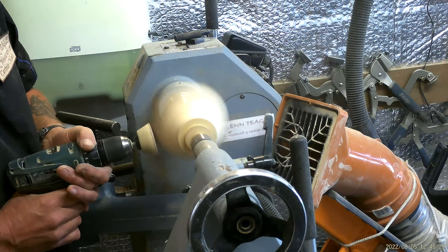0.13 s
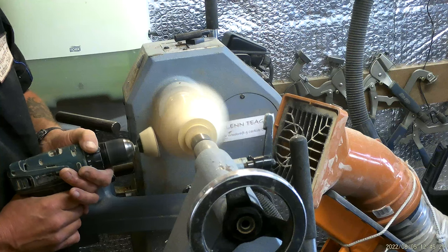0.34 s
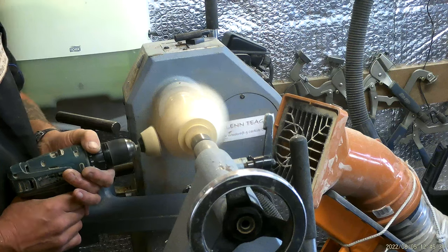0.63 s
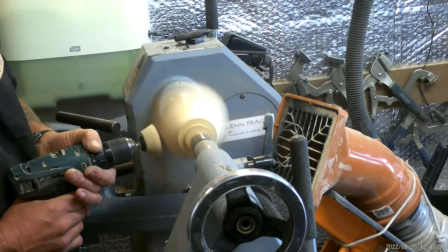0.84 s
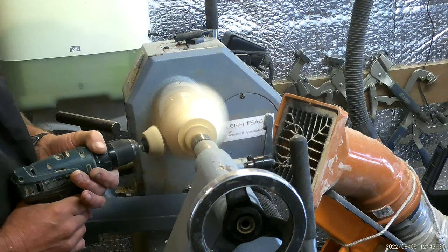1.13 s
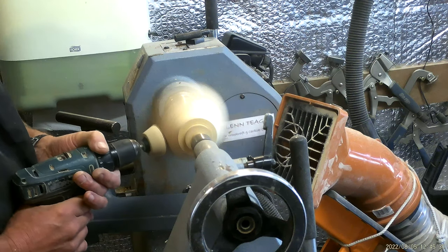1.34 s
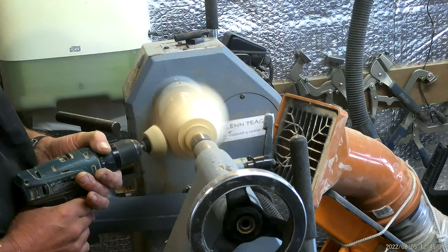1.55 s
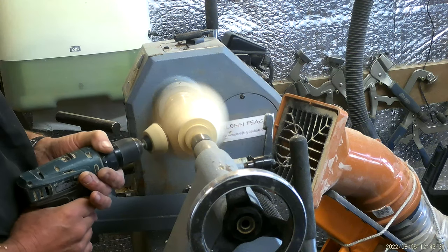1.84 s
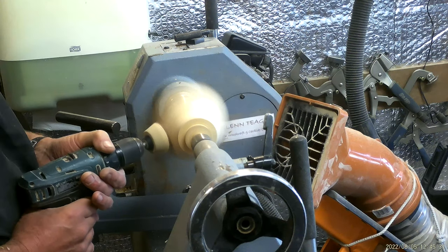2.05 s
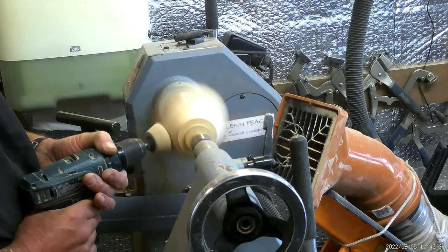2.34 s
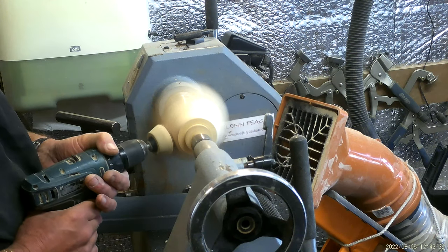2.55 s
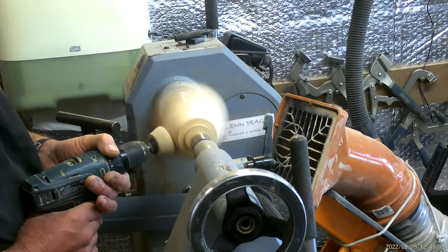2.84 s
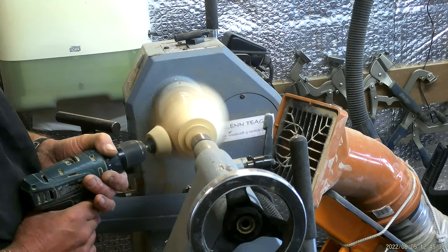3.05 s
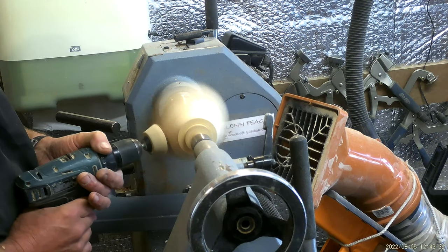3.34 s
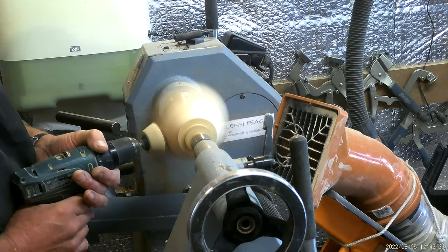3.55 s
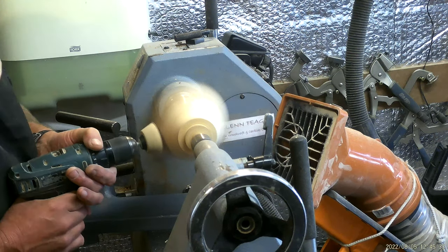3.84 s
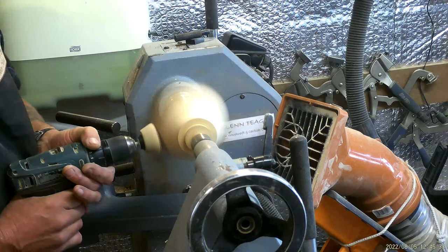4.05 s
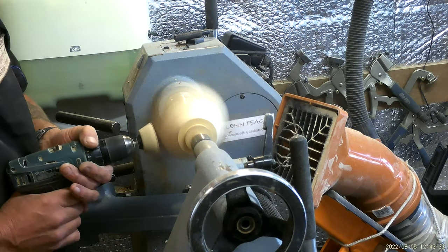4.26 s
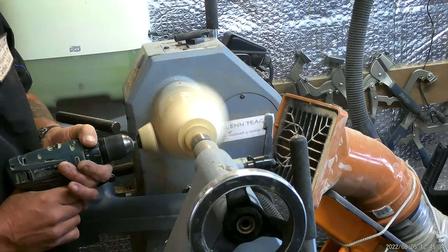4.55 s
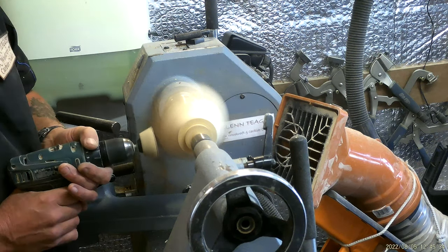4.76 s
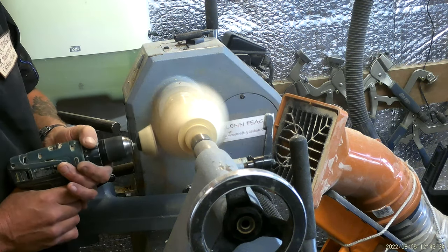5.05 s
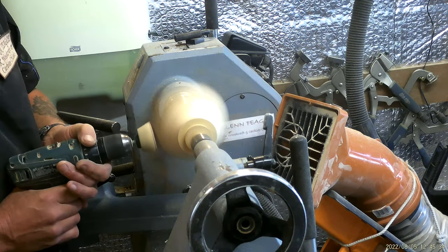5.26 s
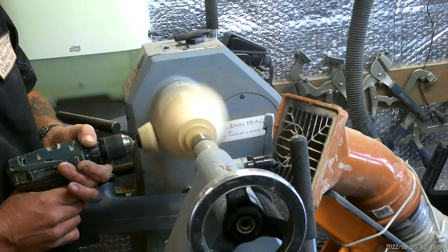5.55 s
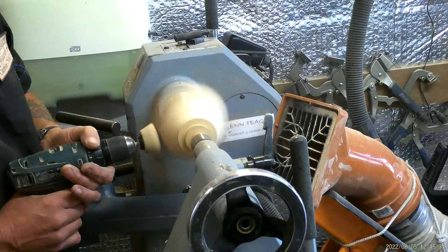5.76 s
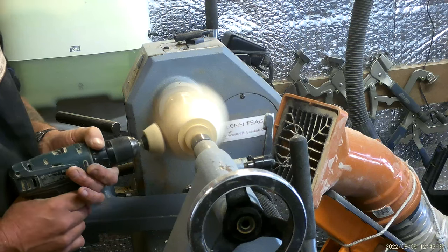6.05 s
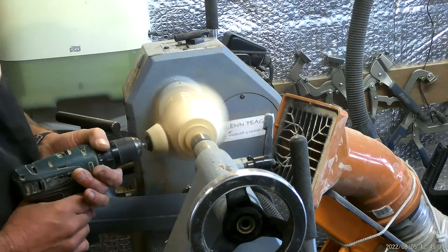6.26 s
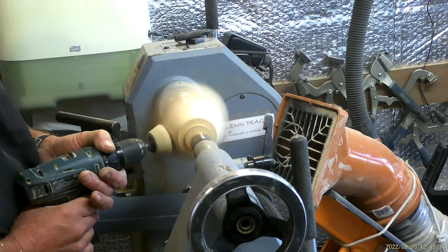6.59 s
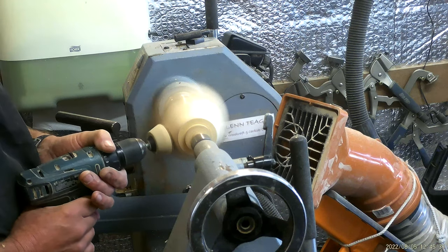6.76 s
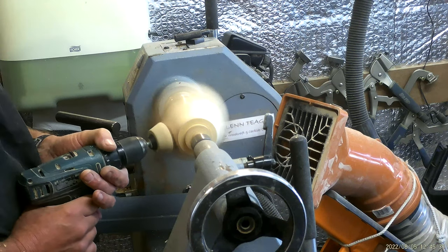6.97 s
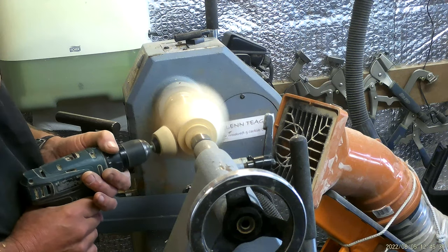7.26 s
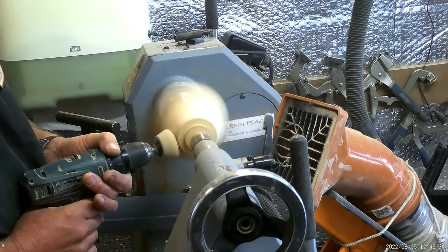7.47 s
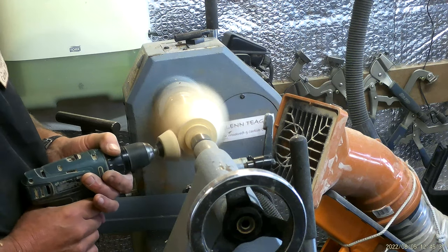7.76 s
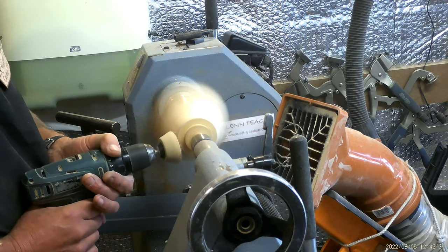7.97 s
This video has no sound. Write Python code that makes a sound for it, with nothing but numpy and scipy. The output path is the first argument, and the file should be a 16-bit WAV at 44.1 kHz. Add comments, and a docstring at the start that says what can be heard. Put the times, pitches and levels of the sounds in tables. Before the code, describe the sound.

Close, dry mono sound in a small workshop. A powered sanding pad rasps loudly on a spinning wooden bowl, fluttering rapidly as end grain passes, the wall ringing in rough mid-pitched chatter over a drill whine. After one second it drops to a faint hiss with soft hollow notes, swells a little, then bears down hard around four to six seconds with snags, and finishes as a brighter rushing hiss.

```python
"""In a small workshop a drill-driven sanding pad works on a wooden bowl that spins on a lathe.
The pad lies flat on the wood, lifts to a light skim, bears down again and rolls onto its rim.
Noise through pose-dependent resonances makes the rasp; the end grain scratches twice a turn.
Noise-driven modes and swelling notes make the bowl's wall ring; short soft low notes swell and die.
Wandering tones make the drill's whine and the lathe's drone; a slow beat throbs in the mains hum."""
import sys
import numpy as np
from scipy import signal
from scipy.fft import rfft, irfft, next_fast_len
from scipy.io import wavfile
from scipy.ndimage import uniform_filter1d, map_coordinates

SR = 44100
rng = np.random.default_rng(int(sys.argv[2]) if len(sys.argv) > 2 else 0)


def store_wav(level_fs):
    """Save 16-bit WAV to argv[1]."""
    pcm = np.round(np.clip(np.atleast_2d(level_fs), -1, 1) * 32767)
    wavfile.write(sys.argv[1], SR, pcm.T.astype(np.int16))


N = 358529
TIME = np.arange(N) / SR
SPINDLE_HZ = 29.48
SLIP_HZ = 0.872  # beat rate of the lathe motor

# pad on wood, the remaining share skims: (time [s], share on flat face [0-1], share on rim [0-1])
POSE = [(0, 0.92, 0.03), (1.0, 0.73, 0.15), (1.4, 0.63, 0.45), (1.75, 0.63, 0.1), (2.2, 0.9, 0),
        (2.7, 0, 0.19), (3.4, 0.24, 0), (3.9, 0.52, 0.35), (4.3, 0.67, 0.15), (6.1, 0.71, 0.18),
        (6.7, 0.08, 0.97), (7.35, 0.02, 0.89), (7.6, 0.19, 0.71), (8.0, 0, 0.64)]
# hand pressure on the pad: (time [s], level [dB re full pressure])
PRESSURE = [(0.22, -5.5), (0.8, -9.5), (1.02, -20), (1.2, -29.5), (2.13, -33), (2.49, -31), (2.73, -16.5),
            (3.1, -15), (3.38, -24), (3.7, -23.5), (3.88, -10), (4.08, -4.5), (4.51, -5), (4.85, -1),
            (5.62, -4.5), (6.2, -4.5), (7.11, -11.5), (7.18, -8), (7.63, -4.5)]
# friction colour on the flat face: (frequency [Hz], relative density [dB])
FACE_COLOUR = [(500, -31), (740, -10), (1000, -17), (2400, -13.5), (4000, -12.5), (6300, -14.5),
               (8200, -17), (10200, -22), (12000, -13.5), (15000, -22)]
# bowl and pad resonances on the flat face: (centre [Hz], width at half lift [Hz], lift [dB])
FACE_MODES = [(1890, 350, 6), (3875, 210, 4.5), (5430, 690, 3.5), (15000, 240, 6)]
# chatter modes of the bowl's wall: (centre [Hz], half-width at -6 dB [Hz],
# weight [dB per unit of face share], weight [dB per unit of (2.5 - face share)])
WALL_MODES = [(965.4, 25, -20, 2.5), (1180, 218, -8.5, 3), (1255, 54, -4.5, 1.95), (1386, 68, 3, 0)]


def amp(db):
    """Gain of a level in dB."""
    return 10 ** (np.asarray(db) / 20)


def unit(x):
    """x scaled to rms 1."""
    return x / np.sqrt(np.mean(x ** 2) + 1e-20)


def curves(rows):
    """Each column after the time, interpolated to one value per sample."""
    time_s, *columns = np.transpose(rows)
    return [np.interp(TIME, time_s, column) for column in columns]


def wobble(rate_hz):
    """Smooth random curve with rate_hz knots a second."""
    knots = rng.standard_normal(int(N * rate_hz / SR) + 4)
    return map_coordinates(knots, [TIME * rate_hz])


def filtered(x, response):
    """x times a response of frequency, zero-padded against wrap-around."""
    size = next_fast_len(N + SR // 2)
    return irfft(rfft(x, size) * response(np.fft.rfftfreq(size, 1 / SR)), size)[..., :N]


def coloured(x, spectrum, modes):
    """x through a broad spectrum with resonant peaks on it."""
    knots_hz, knots_db = np.transpose(spectrum)

    def response(hz):
        db = np.interp(np.log(hz + 1), np.log(knots_hz), knots_db)
        for centre_hz, width_hz, lift_db in modes:
            db = db + lift_db / (1 + (2 * (hz - centre_hz) / width_hz) ** 2)
        return amp(db)
    return filtered(x, response)


def band(x, lo_hz, hi_hz, order=20):
    """The part of x between two frequencies."""
    def edge(ratio):
        return (1 + np.minimum(ratio, 10) ** order) ** -.5
    return filtered(x, lambda hz: edge(lo_hz / (hz + 1)) * edge(hz / hi_hz))


def tone(hz, drift_hz, rate_hz):
    """Sine of rms 1 whose pitch wanders a little."""
    pitch_hz = hz + drift_hz * wobble(rate_hz)
    return np.sqrt(2) * np.sin(2 * np.pi * np.cumsum(pitch_hz) / SR)


def add(track, start_s, sound):
    """Mix a short sound into the track at start_s."""
    part = track[max(round(start_s * SR), 0):][:len(sound)]
    part += sound[:len(part)]


def burst(peak_s, rise_s, hz, blur_rad):
    """Note with a randomly drifting phase that swells for rise_s, peaks at peak_s and dies."""
    t, out = np.arange(SR // 6) / SR, np.zeros(N)
    shape = (t / rise_s * np.exp(1 - t / rise_s)) ** 2
    drift = np.interp(t, np.linspace(0, t[-1], num=24), rng.standard_normal(size=24))
    add(out, peak_s - rise_s, shape * np.sin(2 * np.pi * hz * t + blur_rad * drift))
    return out


def walls(x, t60_s=0.15, wet_db=-8):
    """Close walls and machine parts answer with a short decaying noise tail."""
    t = np.arange(SR // 4) / SR
    tail = rng.standard_normal(len(t)) * amp(-60 * t / t60_s)
    return x + amp(wet_db) * signal.fftconvolve(x, tail / np.linalg.norm(tail))[:N]


def shifting(x, depth_db, size=1024):
    """Random patches of the spectrum swell and fade, smoothed over time and frequency."""
    z = signal.stft(x, nperseg=size)[2]
    field = rng.standard_normal(z.shape)
    field = uniform_filter1d(field, size=4, axis=0)  # over frequency
    field = uniform_filter1d(field, size=9, axis=1)  # over time
    return signal.istft(z * amp(depth_db * unit(field)), nperseg=size)[1][:N]


def rubbing(rim_softens=0.4, hand_db=1.08, judder_db=0.77):
    """Contact force: end grain bites twice a turn, less on the pad's rim, and the hand trembles."""
    # rough end grain: (place in the turn [0-1], 1/e half-width [turns], lift before rim softening [dB])
    end_grain = [(0.18, 0.14, 2), (0.68, 0.094, 3.5)]
    rim = np.clip(curves(POSE)[1], 0, 1)
    turns = SPINDLE_HZ * TIME
    bite_db = np.zeros(N)
    for place, width, lift_db in end_grain:
        offset = (turns - place + .5) % 1 - .5
        bite_db += lift_db * np.exp(-(offset / width) ** 2)
    tremble_db = hand_db * wobble(18) + judder_db * wobble(90)
    return unit(amp(bite_db * (1 - rim_softens * rim) + tremble_db))


def grit(force, spread_db=3):
    """Countless grains of random size scratch the wood in step with the contact force."""
    sizes = amp(spread_db * wobble(3000))
    return force * sizes * rng.standard_normal(N)


def air(level_db=-61.0):
    """A faint steady hiss of band-passed noise lies under everything."""
    return amp(level_db) * unit(band(rng.standard_normal(N), 9100, 13400, order=10))


def lathe(hum_db=-58.0, mains_hz=50, beat_top_s=0.67, waver_db=4.5):
    """The rotor lags the mains slightly, so the hum throbs slowly; motor and belt drone above."""
    # motor and belt lines: (frequency [Hz], level before waver [dB])
    drone_lines = [(589, -62), (982, -64.5)]
    throb = np.cos(np.pi * SLIP_HZ * (TIME - beat_top_s)) ** 2
    out = amp(hum_db) * throb * np.sqrt(2) * np.sin(2 * np.pi * mains_hz * TIME)
    for hz, db in drone_lines:
        out += amp(db + waver_db * wobble(6.5)) * tone(hz, drift_hz=1.84, rate_hz=15)
    return out


def whine(force, hz=1096, waver_db=3.5, rough=0.23, ring_hz=1150, ring_width_hz=150, ring_db=-4.0):
    """Motor whine, loud during hard sanding and faint in the quiet stretches; a broad ring pulses around it."""
    # line level before waver: (time [s], level [dB])
    whine_level = [(0.23, -48.5), (0.94, -35.5), (1.16, -46), (1.35, -59.5), (3.48, -63.5), (4.0, -39.5),
                   (5.73, -38.5), (6.42, -34.5), (6.85, -55.5)]
    level_db, = curves(whine_level)
    line = amp(waver_db * wobble(12)) * tone(hz, drift_hz=0.98, rate_hz=20)
    line = line * (1 + rough * wobble(130))
    ring = filtered(grit(force ** 2), lambda f: np.exp(-((f - ring_hz) / ring_width_hz) ** 2 / 2))
    return amp(level_db) * (line + amp(ring_db) * unit(ring))


def frame_rumble(force, note_hz=299, note_db=-6, throb_db=3, ripple_db=2, throb_top_s=0.2,
                 throb_above_hz=215):
    """Rubbing shakes the lathe's frame; its ring throbs twice and ripples four times a motor beat."""
    # rumble level: (time [s], level [dB])
    rumble_level = [(0.15, -44), (0.8, -51.5), (1.15, -69), (1.7, -58.5), (2.3, -67), (3.1, -54),
                    (3.95, -68), (4.2, -53.5), (4.8, -48.5), (5.9, -50.5), (6.8, -63), (7.15, -54.5),
                    (8.0, -55.5)]
    # frame colour: (frequency [Hz], relative density [dB])
    frame_colour = [(20, -39), (70, -25), (120, -11), (200, -7), (260, -9.5), (350, -2), (420, -8.5),
                    (600, -46)]
    # frame resonance: (centre [Hz], width at half lift [Hz], lift [dB])
    frame_modes = [(298, 32, 9.5)]
    level_db, = curves(rumble_level)
    beat = 4 * np.pi * SLIP_HZ * (TIME - throb_top_s)
    throb = amp(throb_db * np.cos(beat) + ripple_db * np.cos(2 * beat))
    drive = shifting(grit(force), depth_db=2.5, size=2048)
    rumble = unit(coloured(drive, frame_colour, frame_modes))
    upper = band(rumble, throb_above_hz, SR / 2)
    ring = upper + amp(note_db) * tone(note_hz, drift_hz=2.78, rate_hz=14)
    return amp(level_db) * (rumble - upper + throb * ring)


def hollow_note(force, gain_db=-2.0):
    """Rubbing shakes the air in the bowl in uneven lumps; its resonances change under the pad's rim."""
    # note level re gain_db: (time [s], level [dB])
    note_level = [(0.43, -42), (1.31, -54), (2.22, -45), (3.7, -42.5), (3.95, -40.5), (5.39, -49.5),
                  (5.64, -68), (5.92, -43.5), (6.75, -50), (6.97, -39), (8.06, -49)]
    # note colour: (frequency [Hz], relative density [dB])
    note_colour = [(280, -46), (420, -7), (500, -3), (650, 1), (720, -1), (820, -13), (1200, -64)]
    # resonances off and on the rim: (centre [Hz], width at half lift [Hz], lift [dB])
    flat_modes = [(465.5, 41, 11), (588.5, 56, 14)]
    rim_modes = [(440, 110, 11.5)]
    level_db, = curves(note_level)
    rim = np.clip(curves(POSE)[1], 0, 1)
    drive = shifting(grit(force), depth_db=4.5)
    note = (1 - rim) * unit(coloured(drive, note_colour, flat_modes))
    note += rim * unit(coloured(drive, note_colour, rim_modes))
    return amp(level_db + gain_db) * unit(note)


def soft_notes(hz=592.2, rise_s=0.016, blur_rad=0.79):
    """Short soft notes near 590 Hz swell and die."""
    # notes: (time of peak [s], peak level [dB])
    note_rows = [(1.982, -41), (2.132, -38.5), (2.221, -34.5), (2.326, -40.5), (2.429, -38), (2.471, -39.5),
                 (2.751, -29.5), (3.211, -36), (3.385, -38), (3.532, -35), (3.661, -40), (3.848, -34.5),
                 (3.928, -32.5), (3.978, -30.5), (4.031, -33), (4.519, -30)]
    return sum(amp(db) * burst(s, rise_s, hz, blur_rad) for s, db in note_rows)


def squeaks():
    """Stick and slip gathers noise around one pitch: narrow bands squeak, wide ones brush."""
    # swells: (start [s], length [s], pitch [Hz], half-width at -6 dB [Hz], rms level at the top [dB])
    squeak_rows = [(1.335, 0.063, 1900, 160, -53), (1.8, 0.15, 1700, 180, -53),
                   (7.24, 0.093, 1390, 130, -36), (7.262, 0.21, 1690, 150, -39),
                   (7.45, 0.8, 2350, 460, -36), (6.8, 1.7, 988, 10, -47), (7.42, 0.75, 2160, 15, -39),
                   (7.4, 0.9, 4253, 15, -42)]
    out = np.zeros(N)
    freqs = np.fft.rfftfreq(2 * SR, 1 / SR)
    for start_s, length_s, hz, width_hz, db in squeak_rows:
        t = np.arange(int(length_s * SR)) / SR
        noise = rfft(rng.standard_normal(2 * SR))
        narrow = irfft(noise / (1 + 1j * (freqs - hz) / width_hz) ** 2)
        swell = np.sin(np.pi * t / length_s) ** 2
        add(out, start_s, amp(db) * swell * unit(narrow[:len(t)]))
    return out


def singing(hz=2783, gain_db=-47, waver_db=3):
    """A thin high note sings along with the rasp, its level following the pressure."""
    pressure_db, = curves(PRESSURE)
    level_db = pressure_db + gain_db + waver_db * wobble(14)
    return amp(level_db) * tone(hz, drift_hz=0.67, rate_hz=29)


def judders(rise_times_width=0.7, blur_rad=1.23):
    """The pad grabs and the wall rings out; the narrower the nearest mode, the longer it sounds."""
    # grabs: (time of peak [s], pitch [Hz], peak level [dB])
    grabs = [(0.055, 1368, -15.5), (0.096, 1357, -18.5), (0.129, 1366, -18.5), (0.283, 1322, -24.5),
             (0.395, 1370, -28), (0.467, 1396, -22), (0.899, 1190, -25), (0.936, 1150, -27),
             (0.943, 1180, -24), (1.655, 1277, -41.5), (1.879, 988, -41), (2.058, 1370, -40),
             (3.466, 1365, -37), (3.947, 1380, -24.5), (4.762, 1228, -23.5), (4.871, 1380, -24),
             (5.002, 1340, -19.5), (5.047, 1357, -20), (5.09, 1354, -21), (5.175, 1300, -17.5),
             (5.42, 1335, -18.5), (5.452, 1360, -17), (5.485, 1396, -18.5), (5.548, 1367, -20),
             (5.724, 1385, -22), (5.919, 1300, -23), (6.146, 1358, -22), (7.03, 998, -39),
             (7.545, 990, -37), (7.918, 990, -40), (8.12, 990, -34)]
    centres_hz, widths_hz = np.transpose(WALL_MODES)[:2]
    out = np.zeros(N)
    for peak_s, hz, db in grabs:
        nearest = np.argmin(np.abs(centres_hz - hz))
        rise_s = rise_times_width / widths_hz[nearest]
        out += amp(db) * burst(peak_s, rise_s, hz, blur_rad)
    return out


def catches(gain_db=-22, rise_s=0.0014, t60_s=0.25, count=3, fade_db=7):
    """The paper snags on a rough spot: a short harsh scrape, weaker by fade_db on each next turn."""
    # first snags: (time [s], level re gain_db [dB])
    snags = [(0.086, -1), (0.122, -7), (0.461, -3), (4.891, -1.5), (5.143, 0), (5.208, -5), (5.446, 0.5)]
    t, force = np.arange(SR // 8) / SR, np.zeros(N)
    shape = amp(-60 * t / t60_s) * (1 - np.exp(-t / rise_s))
    for s, db in snags:
        for turn in range(count):
            add(force, s + turn / SPINDLE_HZ, amp(db + gain_db - fade_db * turn) * shape)
    scrape = coloured(rng.standard_normal(N), FACE_COLOUR, FACE_MODES)
    return force * unit(band(scrape, 470, 9500, order=6))


def chatter(force, gain_db=-1.7, flutter_db=2.5, surge_db=2.5):
    """Friction rings each mode of the bowl's wall in its own uneven bursts."""
    # ringing level re gain_db: (time [s], level [dB])
    ring_level = [(0.09, -26.5), (0.48, -31.5), (0.58, -37.5), (1.0, -45), (1.3, -55), (1.74, -47.5),
                  (2.23, -50.5), (3.84, -46.5), (3.96, -27), (4.29, -34.5), (4.65, -29.5), (5.45, -28),
                  (5.67, -32.5), (6.43, -29), (6.74, -43)]
    level_db, = curves(ring_level)
    face = np.clip(curves(POSE)[0], 0, 1)
    out, power = np.zeros(N), np.zeros(N)
    for centre_hz, width_hz, face_db, other_db in WALL_MODES:
        ring = filtered(grit(force), lambda hz: 1 / (1 + 1j * (hz - centre_hz) / width_hz) ** 2)
        bursts = force * amp(flutter_db * wobble(45) + surge_db * wobble(13))
        strength = amp(face * face_db + (2.5 - face) * other_db)
        out += strength * unit(ring * bursts)
        power += strength ** 2
    return amp(level_db + gain_db) * out / np.sqrt(power)


def hollowed(x):
    """Sound reflected off the bowl cancels bands of the rasp, each sinking and coming back."""
    # cancelled bands: (start [s], length [s], centre [Hz], 1/e half-width [Hz], greatest depth [dB])
    cancelled_bands = [(0.82, 0.9, 790, 120, -6), (1.05, 1.55, 8000, 1300, -6), (6.35, 1.2, 3050, 280, -6),
                       (3.68, 0.55, 2870, 580, -11), (3.95, 0.85, 1600, 170, -12)]
    for start_s, length_s, centre_hz, width_hz, db in cancelled_bands:
        depth = np.sqrt(np.abs(np.sin(np.pi * np.clip((TIME - start_s) / length_s, 0, 1))))
        part = filtered(x, lambda hz: np.exp(-((hz - centre_hz) / width_hz) ** 2))
        x = x - depth * (1 - amp(db)) * part
    return x


def sanding(force):
    """Scratches sound through bowl and pad: pressure sets the level, pose the resonances."""
    # friction colour on the rim and in the skim: (frequency [Hz], relative density [dB])
    rim_colour = [(600, -54), (1400, -9.5), (3100, -15.5), (4000, -3.5), (6300, -9), (8200, -19.5),
                  (10200, -26), (12000, -21.5), (15000, -33)]
    skim_colour = [(600, -67), (1400, -3), (2200, -11.5), (4000, -13.5), (6500, -5.5), (8000, -16),
                   (10200, -3), (12000, 3.5), (15000, -14)]
    # resonances on the rim and in the skim: (centre [Hz], width at half lift [Hz], lift [dB])
    rim_modes = [(1655, 82, 5.5), (2210, 520, 10.6), (2690, 160, 9.4), (3966, 110, 3.7), (15000, 330, 12)]
    skim_modes = [(2910, 330, 9.1), (15500, 490, 14)]
    # rows rasp, hiss, dust fizz: (level at full pressure [dB], growth [dB per dB of pressure],
    # lift on the flat face [dB], lift on the rim [dB])
    friction = [(-30, 1.13, 6, -2), (-25.5, 1.0866, -1.03, 4.5), (-39, 1.23, 5.5, -2.6)]
    pressure_db, = curves(PRESSURE)
    face, rim = np.clip(curves(POSE), 0, 1)
    shares = np.array([face, rim, np.clip(1 - face - rim, 0, 1)])
    weights = np.sqrt(shares / shares.sum(axis=0))
    poses = [(FACE_COLOUR, FACE_MODES), (rim_colour, rim_modes), (skim_colour, skim_modes)]
    voices = []
    for colour, modes in poses:
        scratches = shifting(walls(grit(force)), depth_db=3.0)
        voices.append(coloured(scratches, colour, modes))
    voices = np.array(voices)
    edges_hz = [600, 3450, 8500, SR / 2]
    out = np.zeros(N)
    for row, lo_hz, hi_hz in zip(friction, edges_hz, edges_hz[1:]):
        full_db, growth, face_db, rim_db = row
        level_db = full_db + growth * pressure_db + face_db * face + rim_db * rim
        parts = band(voices, lo_hz, hi_hz, order=26)
        out += amp(level_db) * sum(w * unit(part) for w, part in zip(weights, parts))
    return out


def scene():
    """One contact force drives rasp, wall, frame and whine's ring; all sum to two equal channels."""
    force = rubbing()
    background = air() + lathe() + whine(force) + frame_rumble(force) + hollow_note(force)
    details = soft_notes() + squeaks() + singing() + judders() + catches()
    mono = background + details + chatter(force) + hollowed(sanding(force))
    return np.array([mono, mono])


def record(dry, top_hz=15700):
    """Steep band-pass, with nothing kept from top_hz up."""
    return filtered(band(dry, 15, 16600, order=110), lambda hz: hz < top_hz)


dry = scene()
out = record(dry)
store_wav(out)
```